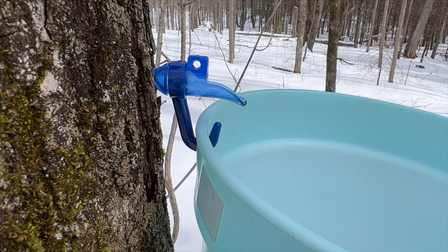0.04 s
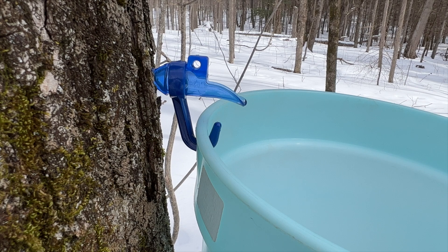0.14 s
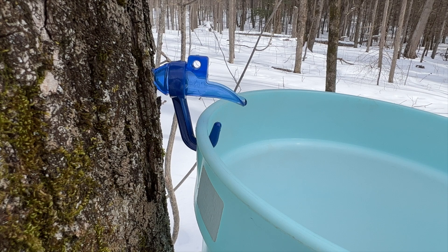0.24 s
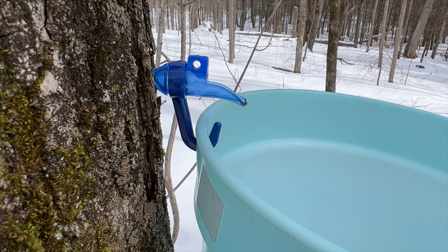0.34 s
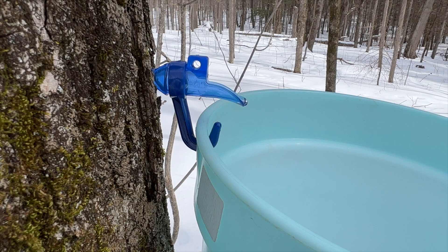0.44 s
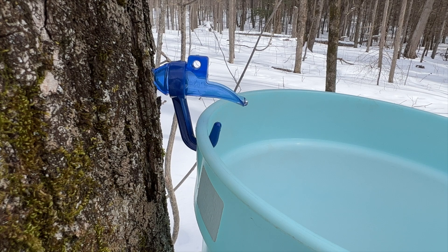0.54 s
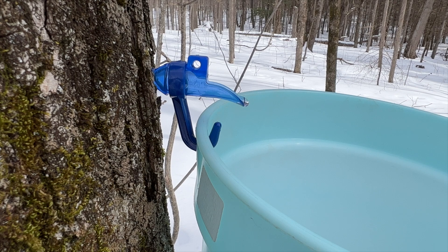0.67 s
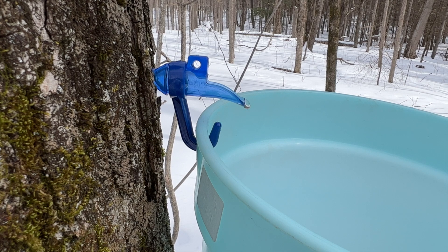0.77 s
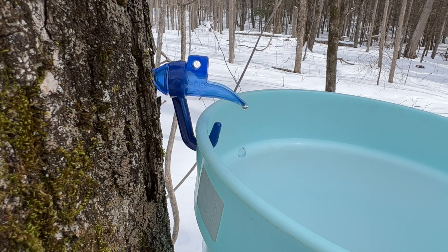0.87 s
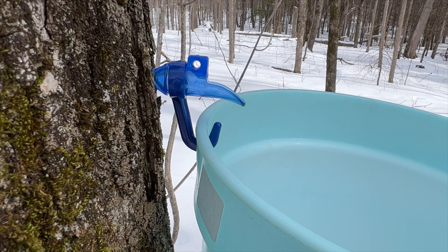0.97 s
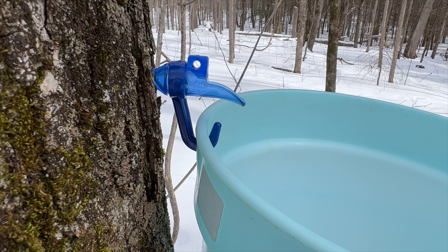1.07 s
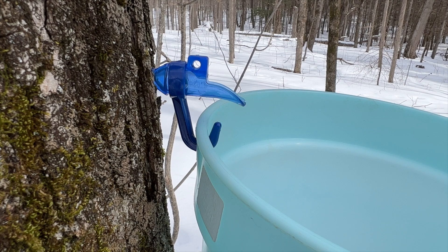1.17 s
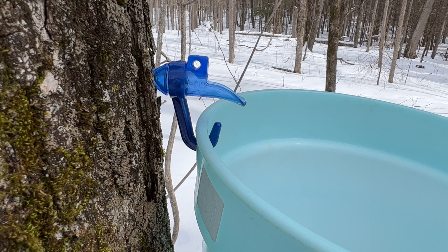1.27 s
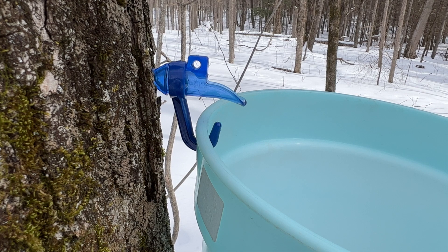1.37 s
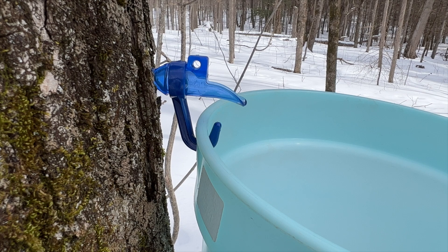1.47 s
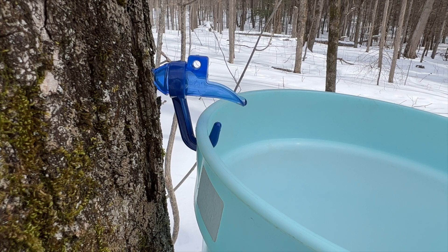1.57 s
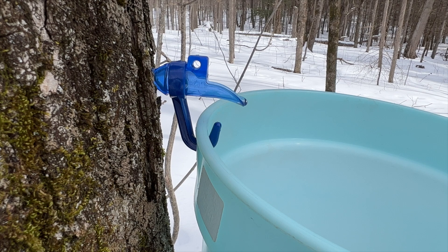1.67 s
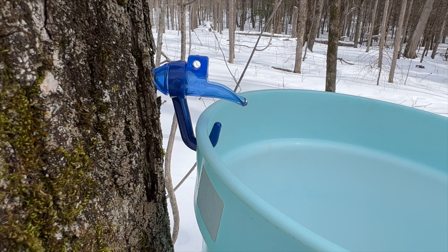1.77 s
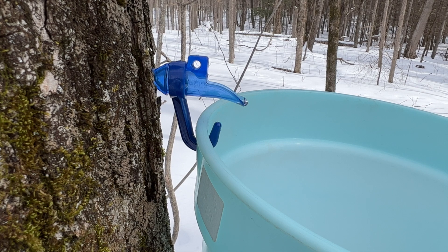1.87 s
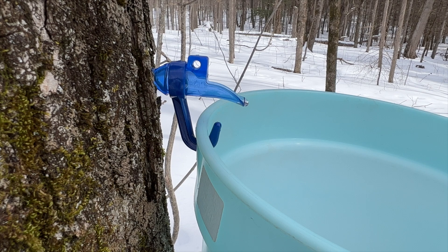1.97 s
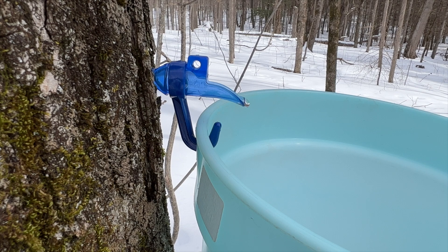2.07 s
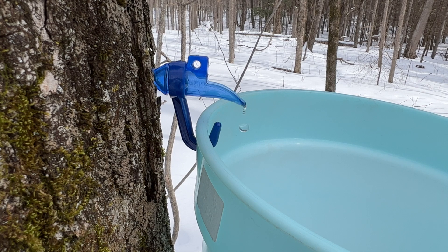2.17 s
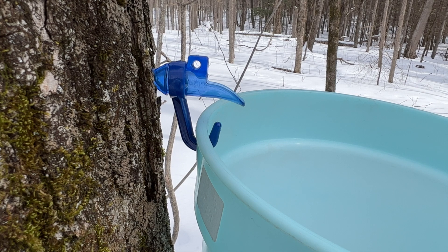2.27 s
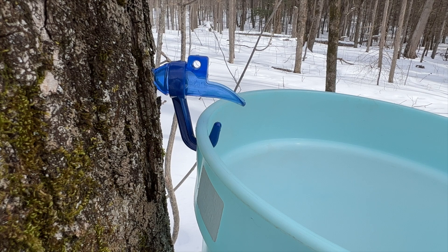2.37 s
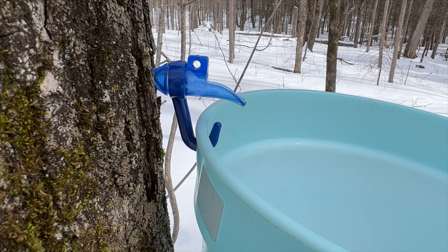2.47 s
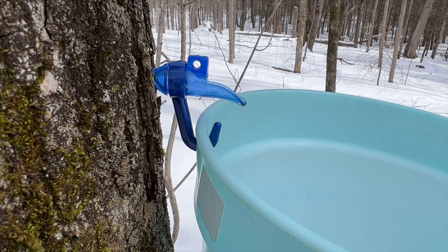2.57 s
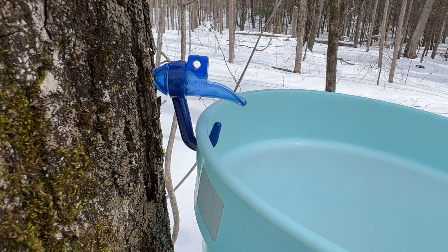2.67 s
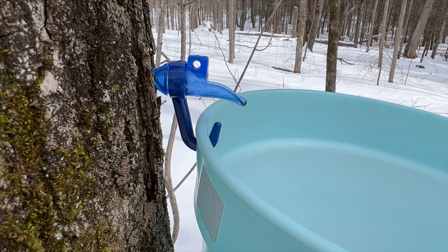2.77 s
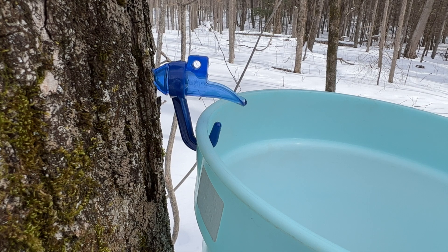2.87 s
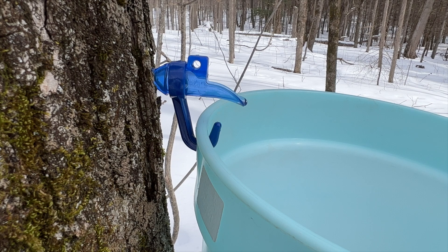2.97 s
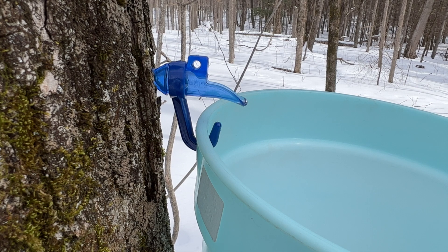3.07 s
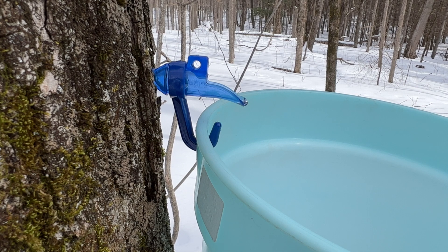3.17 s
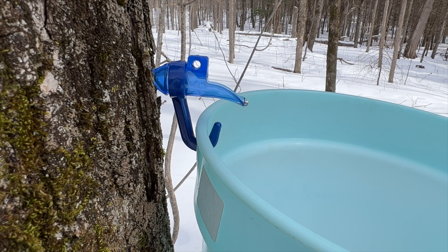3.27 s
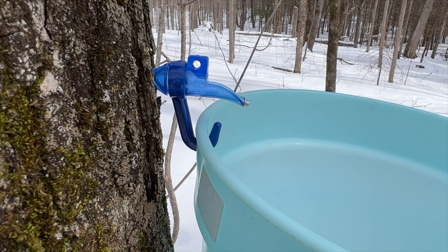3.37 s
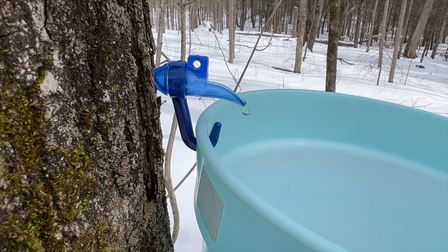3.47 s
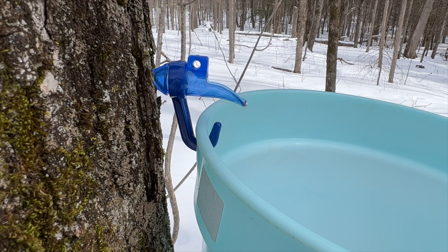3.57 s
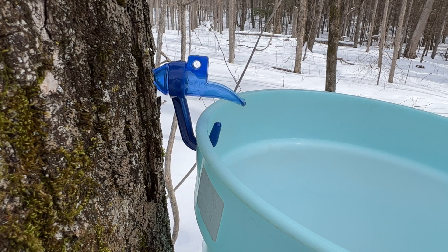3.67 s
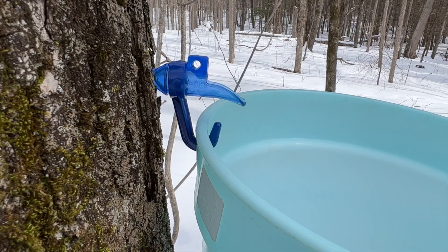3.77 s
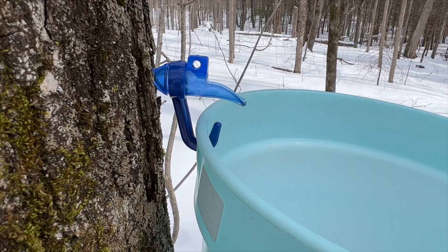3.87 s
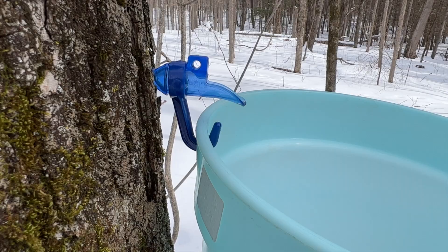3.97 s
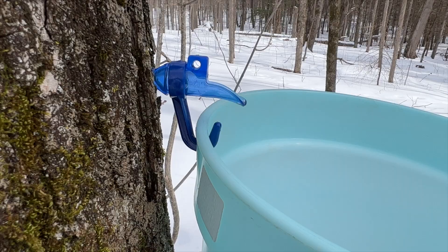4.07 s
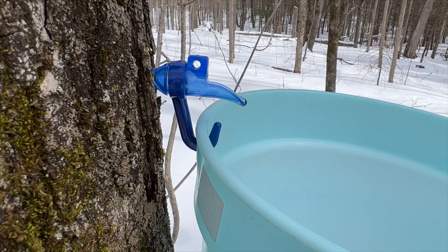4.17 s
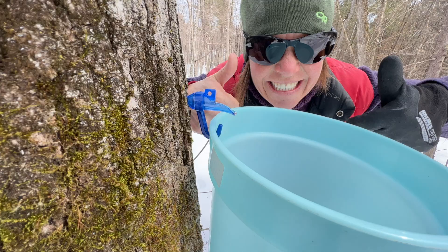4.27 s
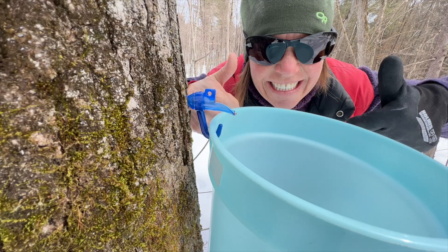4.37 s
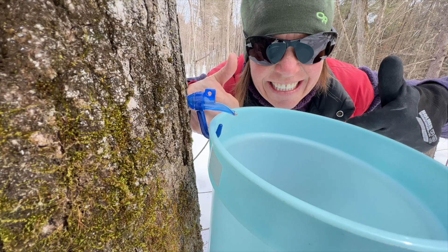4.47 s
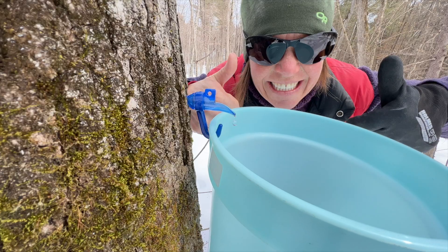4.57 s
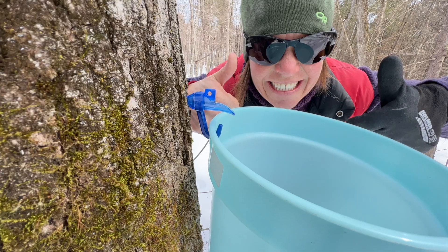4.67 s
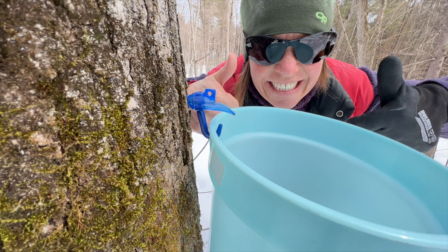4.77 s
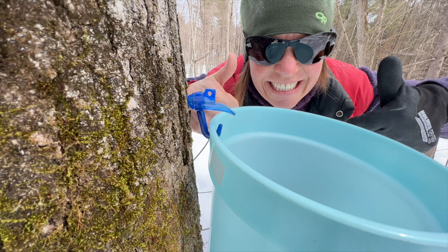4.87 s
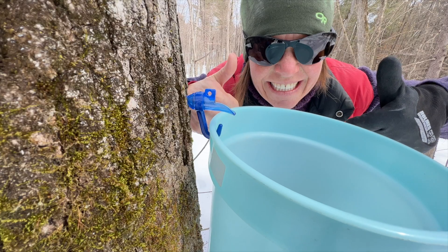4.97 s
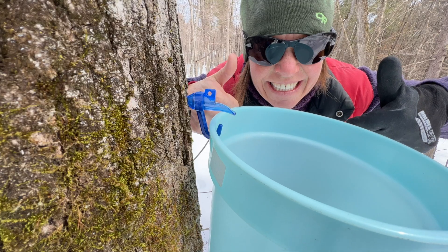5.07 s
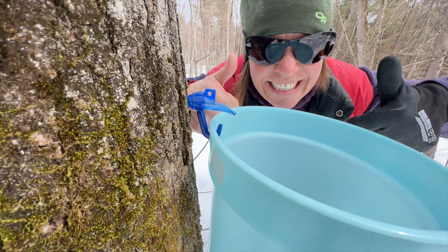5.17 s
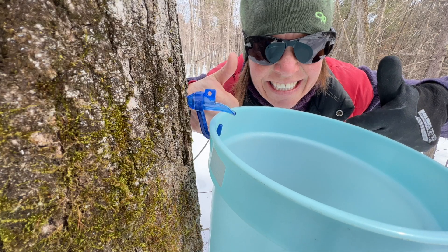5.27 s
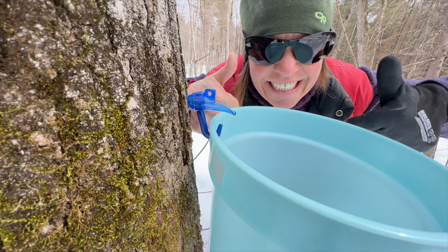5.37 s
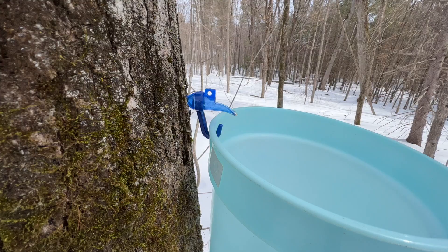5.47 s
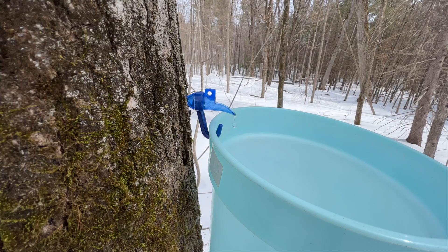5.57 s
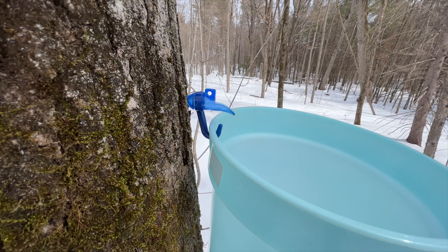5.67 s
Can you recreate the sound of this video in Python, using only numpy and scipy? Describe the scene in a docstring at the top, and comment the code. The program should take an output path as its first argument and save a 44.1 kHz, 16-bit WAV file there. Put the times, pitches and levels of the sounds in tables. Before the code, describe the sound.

Close hand-held stereo pickup outdoors: low rumble and soft air, fabric rustling and dull handling knocks first, then a slow drip of sap into an empty plastic bucket, resonant and short. A cluster of dry snaps follows the first drop. After the third, a tiny far bird cheep, an abrupt change to brighter air, a fourth drop, and finally an abrupt scrape with bumps and snaps.

```python
"""The air of a snowy wood, shaped noise over a low rumble; close by, clothing rustles in grainy friction noise.
The hand-held recorder gets small falling-pitch bumps, and dry ringing snaps tick now and then.
From 1.1 s four drops of sap fall from a spout onto an empty plastic bucket: ringing modes and a noisy splat.
Before the last drop a far bird cheeps in two gliding sines; then a cut to a second shot, where the air hisses more.
A loud scuff of broad noise, with more bumps and snaps, ends the second shot."""
import sys
import numpy as np
from scipy import signal
from scipy.fft import rfft, irfft
from scipy.io import wavfile

SR = 44100
rng = np.random.default_rng(int(sys.argv[2]) if len(sys.argv) > 2 else 0)


def volts(x):
    """Linear amplitude factor 10**(x/20) for a level x in dB, scalar or array-like."""
    e = np.asarray(x, float) / 20
    return 10 ** e


def to_wav(sig):
    """Store sig (one row per channel, or 1-D mono) as 16-bit WAV at the path in sys.argv[1].

    Samples outside -1..1 are clipped; the rate is SR.
    """
    pcm = np.clip(np.atleast_2d(sig), -1, 1) * 32767
    pcm = np.round(pcm).astype(np.int16)
    wavfile.write(sys.argv[1], SR, pcm.T)  # frames by channels


N = 252686
CUT_S = 4.355

# colour of crisp cloth friction: (frequency [Hz], relative level [dB per Hz])
CRISP_COLOUR = [(1470, -31.5), (2500, -4), (3100, -1), (4100, -6), (5100, -1), (6600, -7), (7950, 0),
                (9000, -6), (11500, -3), (14600, -5.5), (16000, -41)]
# likeness of the two sides: (frequency [Hz], correlation [-1..1])
LIKENESS = [(60, 0.97), (150, 0.974), (380, 0.718), (950, 0.177), (2380, 0.258), (5980, 0.2),
            (10000, 0.093), (12500, 0.2), (15000, .2)]
# likeness of the two sides for the snaps and the scuff: (frequency [Hz], correlation [-1..1])
CLOSE_LIKENESS = [(60, 0.91), (150, 0.8), (380, 0.29), (950, 0.73), (2380, 0.904), (5980, 0.07),
                  (15000, 0.16)]
# usual balance of the noises: (frequency [Hz], left over right [dB])
LEFT_OVER_RIGHT = [(60, 3), (130, -1), (290, 5), (640, 0), (1410, 4), (3100, 2), (5600, 9), (8000, 3),
                   (15000, -2)]


def at_hz(points, hz):
    """Read a table on a log-frequency axis."""
    table_hz, values = np.transpose(points)
    return np.interp(np.log(hz + 1), np.log(table_hz), values)


def drift(rate_hz):
    """Slow random wander with spread 1: white noise through two equal one-pole lowpasses."""
    r = np.exp(-2 * np.pi * rate_hz / SR)
    slow = signal.lfilter([1], [1, -2 * r, r * r], rng.standard_normal(N + SR))[SR:]
    return slow / slow.std()


def noise(spectrum, likeness, grain_db=0, size=N, lag_ms=0.4032, balance=LEFT_OVER_RIGHT):
    """Stereo noise, rms 1, with a colour, likeness, left lag and balance; grains scale each sample at random."""
    hz = np.arange(size // 2 + 1) * SR / size
    grains = volts(grain_db * np.minimum(rng.exponential(1, size), 5))
    mid, side = rfft(rng.standard_normal((2, size)) * grains)
    alike = np.clip(at_hz(likeness, hz), -.98, .98)
    ears = np.sqrt(1 + alike) * mid + np.sqrt(1 - alike) * side * [[1], [-1]]
    ears = ears * volts(at_hz(balance, hz) * [[.5], [-.5]] + at_hz(spectrum, hz))
    lagging = hz < 10800    # the top octave arrives together
    ears[0] *= np.exp(-2j * np.pi * hz * lagging * lag_ms / 1000)
    ears = irfft(ears, size)
    return ears / ears.std()


def add(out, s, sound):
    """Mix a sound in at a time in seconds."""
    i = round(s * SR)
    out[:, i:i + sound.shape[1]] += sound[:, :N - i]


def dying(t, t60):
    """Decay of 60 dB in t60 seconds, silent before the start."""
    return volts(-60 * t / t60) * (t >= 0)


def pan(db):
    """Gains of the two ears for a left-over-right difference in dB."""
    return volts(np.array([[db / 2], [-db / 2]]))


def after_cut():
    """0 in the first shot, 1 in the second, with a ramp of 6.1 ms between."""
    return np.clip((np.arange(N) / SR - CUT_S) / 0.0061, 0, 1)


def woodland():
    """Lumpy low rumble and gently wavering air, whose colour changes at the cut."""
    # average rumble level: (time [s], level [dB])
    rumble_level = [(0., -60), (1.2, -55.5), (1.48, -61.5), (3.69, -61.5), (4.64, -61), (4.93, -57),
                    (5.63, -58.5), (5.73, -46)]
    # rumble colour: (frequency [Hz], relative level [dB per Hz])
    rumble_colour = [(15, -23.5), (25, -14.5), (54, 0), (74, 1), (130, -9.5), (193, -8), (250, -16.5),
                     (320, -36), (550, -120)]
    # air colour in the first shot: (frequency [Hz], relative level [dB per Hz])
    first_colour = [(88, -26.5), (150, -9), (240, -9), (334, -4.5), (448, -7), (555, -13.5), (998, -17.5),
                    (1720, -26.5), (5460, -30), (8500, -39), (11500, -42.5), (14000, -48), (16000, -77.5)]
    # air colour in the second shot: (frequency [Hz], relative level [dB per Hz])
    second_colour = [(88, -31.5), (150, -14), (190, -5.5), (222, -11.5), (259, -1.5), (466, -8.5),
                     (624, -13.5), (675, -13), (745, -12), (1900, -17.5), (2550, -24), (5250, -26),
                     (8230, -24.5), (13200, -37.5), (16000, -76.5)]
    rumble_db = np.interp(np.arange(N) / SR, *np.transpose(rumble_level))
    rumble = volts(rumble_db + 1.5 * drift(14)) * noise(rumble_colour, LIKENESS)
    first = volts(-65.5 + 1.97 * drift(8.66)) * noise(first_colour, LIKENESS)
    second = volts(-62 + .6 * drift(3)) * noise(second_colour, LIKENESS)
    return rumble + first * np.sqrt(1 - after_cut()) + second * np.sqrt(after_cut())


def bird():
    """Two faint sine notes, the first gliding slightly down and the second up."""
    # notes: (time [s], length [s], first pitch [Hz], last pitch [Hz], level [dB])
    notes = [(4.172, 0.04, 4690, 4580, -73.5), (4.2, 0.024, 5350, 5800, -76)]
    out = np.zeros((2, N))
    for s, length_s, first_hz, last_hz, db in notes:
        hz = np.linspace(first_hz, last_hz, round(length_s * SR))
        tone = np.hanning(len(hz)) * np.sin(2 * np.pi * np.cumsum(hz) / SR)
        add(out, s, volts(db) * pan(3) * tone)
    return out


def clothing():
    """Grainy friction noise in a crisp and a dull layer; each movement swells and fades evenly in dB."""
    # movements: (loudest moment [s], crisp level [dB], dull level [dB],
    #             time to swell by 20 dB [s], time to fade by 20 dB [s])
    movements = [(0.0, -70.5, -76.5, .1, .2), (0.09, -77, -71, .07, .08),
                 (0.158, -57.5, -73.5, 0.058, 0.07), (0.474, -63, -65.5, 0.1869, 0.23),
                 (0.8, -75.5, -86.5, 0.02, 0.32), (1.066, -67, -66.5, 0.1575, 0.1567),
                 (1.568, -73, -68.5, 0.1826, 0.24), (2.05, -76.5, -63, 0.1326, 0.39),
                 (2.39, -76.5, -69, 0.0348, .1), (2.92, -79, -79.5, 0.22, 0.33),
                 (3.468, -53, -64, .07, .05), (3.535, -64.5, -67, 0.0319, 0.054),
                 (3.739, -73, -69, 0.1428, 0.1754), (3.984, -71.5, -74.5, 0.0254, 0.2749),
                 (5.536, -55, -61.5, 0.0732, 0.2959)]
    # colour of the dull rub: (frequency [Hz], relative level [dB per Hz])
    rub_colour = [(470, -40), (800, -4), (1300, -0.5), (1900, -2), (2400, -11), (2900, -11), (3600, -19),
                  (4550, -35.5), (7700, -90)]
    t = np.arange(N) / SR
    crisp, rub = volts(-84), volts(-86.5)    # at rest
    for s, crisp_db, rub_db, swell_s, fade_s in movements:
        shape = volts(-20 * np.maximum((s - t) / swell_s, (t - s) / fade_s))
        crisp = np.hypot(crisp, volts(crisp_db) * shape)
        rub = np.hypot(rub, volts(rub_db) * shape)
    crisp = crisp * volts(0.9 * drift(53)) * noise(CRISP_COLOUR, LIKENESS, grain_db=3.5)
    rub = rub * volts(1.8 * drift(40)) * noise(rub_colour, LIKENESS, grain_db=2.5)
    return crisp + rub


def scuff():
    """Rough broad friction noise that bursts in and stays until the end."""
    # scuff colour: (frequency [Hz], relative level [dB per Hz])
    scuff_colour = [(180, -37.5), (300, -8.5), (385, 2.5), (555, -20.5), (1150, -1), (2280, -2.5),
                    (2740, -9.5), (3520, -6.5), (7690, -9.5), (8640, -4.5), (11500, -10), (14700, -22),
                    (16000, -45.5)]
    # scuff balance: (frequency [Hz], left over right [dB])
    scuff_balance = [(60, -0.5), (130, -3), (290, 7.5), (640, 2), (1410, 1.5), (3100, 7), (6820, 14),
                     (15000, -1.5)]
    start_s, level_db, rise_s = 5.653, -37, .003    # rises 20 dB in rise_s
    t = np.arange(N) / SR
    db = level_db - 20 * np.maximum(start_s - t, 0) / rise_s + 1.71 * drift(93)
    return volts(db) * noise(scuff_colour, CLOSE_LIKENESS, grain_db=1.5, lag_ms=0.02, balance=scuff_balance)


def ticks():
    """A dry snap: a short ring at its pitch inside a burst of grainy noise, with a crisp edge on top."""
    # snaps: (time [s], level [dB], pitch [Hz], crisp edge relative to the snap [dB])
    snaps = [(1.6143, -59, 1440, -11.5), (1.9939, -40.5, 1950, -23.5), (1.9983, -34, 2044, -28),
             (2.0035, -38, 1530, -26), (2.015, -42, 1413, -23.5), (2.024, -45, 2914, -28),
             (2.0326, -50, 1439, -25.5), (2.3703, -46, 3100, -16), (3.5235, -46.5, 3155, -2),
             (3.7249, -49.5, 2990, -13.5), (5.6522, -31, 1125, -16.5), (5.664, -28, 1274, -7.5),
             (5.6872, -31, 1308, -12), (5.7119, -34, 1120, -12)]
    out, t = np.zeros((2, N)), np.arange(SR // 10) / SR
    shape = dying(t, 0.0306) * (1 - np.exp(-t / 0.0012))
    for s, db, hz, edge_db in snaps:
        colour = [(0.47 * hz, -30), (0.55 * hz, -10), (hz, 0), (1.164 * hz, -12),
                  (1.54 * hz, -5), (2.005 * hz, -25), (3.4 * hz, -45)]
        burst = volts(-6) * noise(colour, CLOSE_LIKENESS, grain_db=4.0, size=len(t), lag_ms=0,
                                balance=[(1000, 0.0024)])
        edge = volts(edge_db) * noise(CRISP_COLOUR, CLOSE_LIKENESS, size=len(t), lag_ms=0, balance=[(1000, 0)])
        ring = volts(-4) * np.sin(2 * np.pi * hz * t)
        add(out, s, volts(db) * pan(1.5) * (ring + burst + edge) * shape)
    return out


def bumps():
    """A soft knock whose pitch keeps falling as the slower lows arrive, roughened by a puff of low noise."""
    # bumps on the recorder: (time [s], level [dB], pitch passed after 12 ms [Hz], left over right [dB])
    knocks = [(0.17, -44, 101.4, 3), (0.457, -44.5, 116.2, 1.5), (0.526, -38.5, 96.2, 2),
              (0.887, -43, 83.7, 2), (1.059, -50, 84, 4), (2.019, -47, 129, 2), (2.374, -44.5, 89.9, 2.5),
              (2.89, -48.5, 79.6, 2), (2.95, -49, 68, 1.5), (5.138, -45, 70.7, 14.5),
              (5.359, -47.5, 62.7, 4.5), (5.659, -35.5, 169.6, 2.5), (5.689, -27.5, 150.2, 1)]
    out, t = np.zeros((2, N)), np.arange(SR // 4) / SR
    shape = (1 - np.exp(-t / 0.00642)) * dying(t, 0.1273)
    shape = shape / shape.max()
    for s, db, hz, pan_db in knocks:
        turns = 2.542 * hz * 0.007623 * np.log(1 + t / 0.007403)    # pitch falls as 1 / (t + 7.4 ms)
        colour = [(0.43 * hz, -12), (hz, 0), (3.92 * hz, -12), (8 * hz, -40), (30 * hz, -110)]
        puff = volts(-8) * noise(colour, LIKENESS, size=len(t))
        add(out, s, volts(db) * pan(pan_db) * shape * (np.sin(2 * np.pi * turns) + puff))
    return out


def bucket_boom(t, bright_db, sway_hz):
    """A drop sways the wall and strikes all modes of the bucket, neighbours in opposite sense."""
    # bucket modes: (frequency [Hz], level [dB], T60 [s], left over right [dB], left lag [ms])
    modes = [(174.5, -13.5, 0.0436, -1, 0.22), (212.65, -5.5, 0.1614, -1.5, 0.022),
             (285.54, 1.5, 0.132, 0.08, 0.035), (438.4, -18, 0.1103, 1, 0.21),
             (465.9, -11, 0.0618, 4., 0.039), (581, -24, 0.016, 7, 0.354),
             (798.6, -11.5, 0.0399, 3.5, 0.128), (909, -13, 0.0817, 6.5, 0.572),
             (967.7, -18, 0.0452, -19, 0.048), (977, -23, 0.0299, 1, 0.011),
             (1049.3, -14.5, 0.065, 1.5, 0.259), (1330, -24, 0.0548, 9, 0.19), (1699, -10, 0.0155, 3, 0.17),
             (1836, -16.5, 0.0303, 1.5, 0.045), (2210, -23.5, 0.0187, -12, 0.056),
             (2569, -21, 0.0259, 11.5, 0.23), (2867, -32.5, 0.0694, -2.5, 0.304),
             (3536, -32, 0.0142, 11, 0.00089)]
    contact_s = 0.000411
    swell = 1 - np.exp(-t / 0.0145)
    boom = volts(-12.5) * dying(t, 0.322) * swell * np.sin(2 * np.pi * sway_hz * t)
    onset = 1 - np.exp(-t / contact_s)
    for k, (hz, mode_db, t60, pan_db, lag_ms) in enumerate(modes):
        late = t - np.array([[lag_ms / 1000], [0]])
        strength = volts(mode_db + bright_db * (hz > 400) + rng.normal(0, 1.0))
        ring = dying(late, t60) * np.sin(2 * np.pi * hz * late)
        boom = boom + (-1) ** k * strength * onset * pan(pan_db) * ring
    return boom


def drop_splat(t, bright_db):
    """Grainy noise of the drop bursting: a short splat and a weaker, longer spray."""
    # splat colour: (frequency [Hz], relative level [dB per Hz])
    splat_colour = [(300, -24), (620, -0.5), (1500, -1), (3000, -9), (5000, -17.5), (6500, -23),
                    (8200, -14), (10000, -12), (11500, -13.5), (15000, -27)]
    fade = volts(-20.5) * dying(t, 0.045) + volts(-42) * dying(t, 0.43)    # splat, spray
    onset = 1 - np.exp(-t / .001)
    return fade * onset * volts(bright_db) * noise(splat_colour, LIKENESS, grain_db=3.5, size=len(t))


def delay_lows(x):
    """Allpasses for bending waves, which carry the highs ahead, and the bucket's air, which swells slowly."""
    bending_hz, swell_hz, swell_width_hz = 520, 260, 287
    bend = np.exp(-2 * np.pi * bending_hz / SR)
    r, w = np.exp(-np.pi * swell_width_hz / SR), 2 * np.pi * swell_hz / SR
    middle = -2 * r * np.cos(w)
    # the tiny offset keeps the filters from slowing down in silence
    x = signal.lfilter([-bend, 1], [1, -bend], x + 1e-18)
    return signal.lfilter([r * r, middle, 1], [1, middle, r * r], x + 1e-18)


def drops():
    """Each drop booms the bucket and splats; the bucket then delays the lows of both."""
    # drops: (time [s], level [dB], brightness [dB], wall sway pitch [Hz])
    falls = [(1.1398, -24, 0., 118), (2.4692, -22, -0.5, 111.6), (3.8063, -22.5, 1, 115),
             (4.873, -23, 3.5, 101.9)]
    out, t = np.zeros((2, N)), np.arange(SR // 2) / SR
    for s, db, bright_db, sway_hz in falls:
        add(out, s, volts(db) * bucket_boom(t, bright_db, sway_hz))
        add(out, s - .0004, volts(db) * drop_splat(t, bright_db))    # the thin tick leads the boom
    return delay_lows(out)


def scene():
    """Everything at the microphones."""
    return woodland() + bird() + clothing() + scuff() + ticks() + bumps() + drops()


def notch(x, notches):
    """Cut bell-shaped notches out of the spectrum."""
    hz = np.arange(N // 2 + 1) * SR / N
    cut_db = sum(db * np.exp(-(2 * (hz - centre_hz) / width_hz) ** 2) for centre_hz, width_hz, db in notches)
    return irfft(rfft(x) * volts(cut_db), N)


def microphones(x, sum_notches):
    """Sum and difference of the two sides each lose their own bands."""
    # where the sides agree and their difference is weak: (frequency [Hz], width [Hz], depth [dB])
    side_notches = [(13700, 1700, -22)]
    mid = notch((x[0] + x[1]) / 2, sum_notches)
    side = notch((x[0] - x[1]) / 2, side_notches)
    return np.array([mid + side, mid - side])


def top_cut(x):
    """Nothing passes above the cut-off."""
    return signal.sosfilt(signal.butter(12, 16470, fs=SR, output="sos"), x)


def record(dry):
    """Each shot has its own notches; the mix crosses quickly from the first to the second."""
    # bands cancelling in the sum, first shot: (frequency [Hz], width [Hz], depth [dB])
    first_notches = [(4313, 750, -3.5), (10084, 1364, -27)]
    # bands cancelling in the sum, second shot: (frequency [Hz], width [Hz], depth [dB])
    second_notches = [(11326, 1920, -12.5)]
    # narrow dips on both sides, second shot: (frequency [Hz], width [Hz], depth [dB])
    second_dips = [(5300, 220, -7), (7600, 350, -9)]
    first = microphones(dry, first_notches)
    second = microphones(notch(dry, second_dips), second_notches)
    return top_cut(first * (1 - after_cut()) + second * after_cut())


dry = scene()
out = record(dry)
to_wav(out)
```